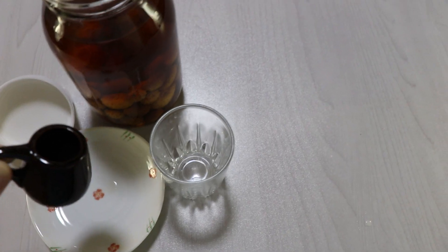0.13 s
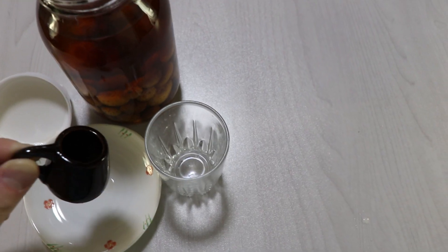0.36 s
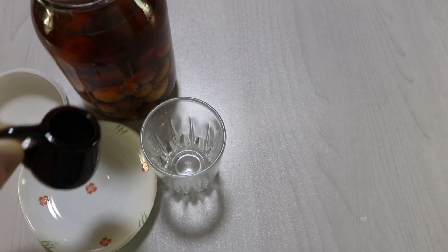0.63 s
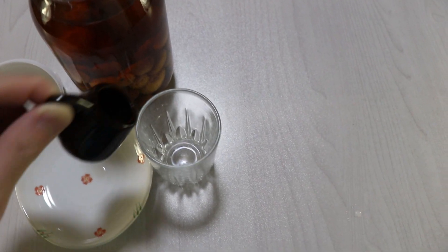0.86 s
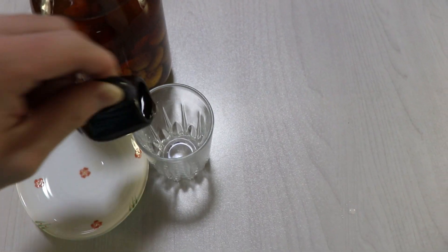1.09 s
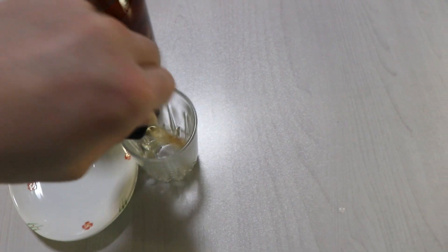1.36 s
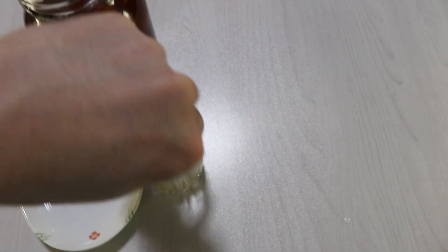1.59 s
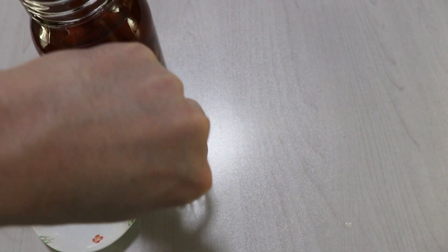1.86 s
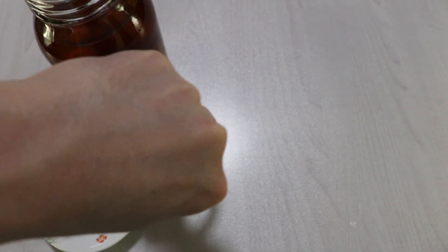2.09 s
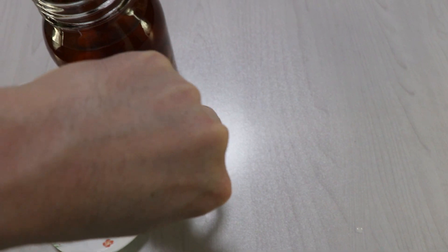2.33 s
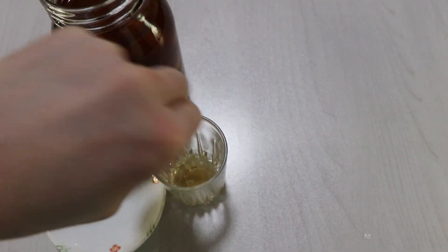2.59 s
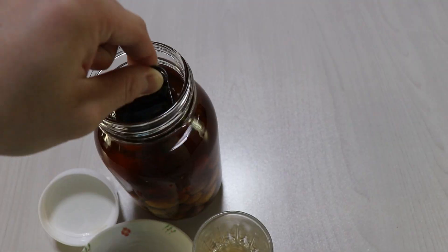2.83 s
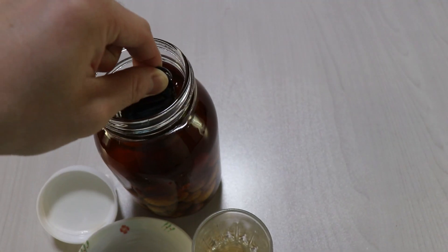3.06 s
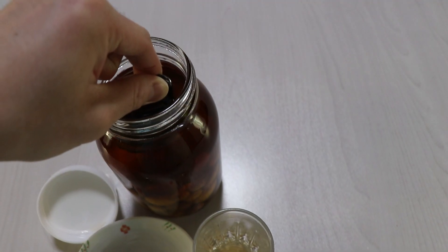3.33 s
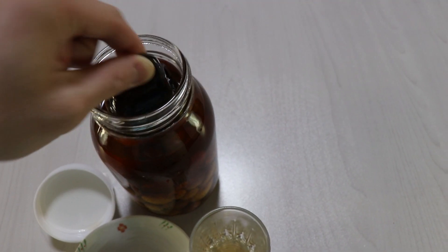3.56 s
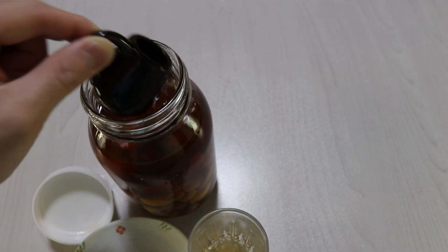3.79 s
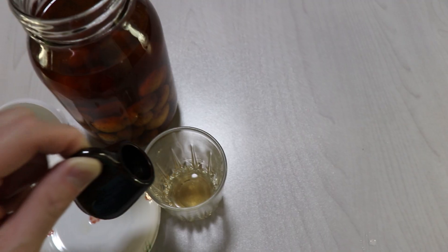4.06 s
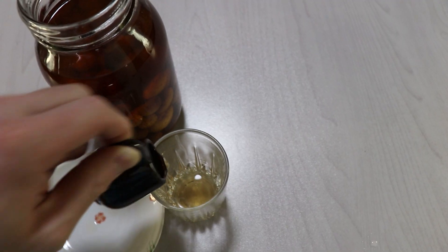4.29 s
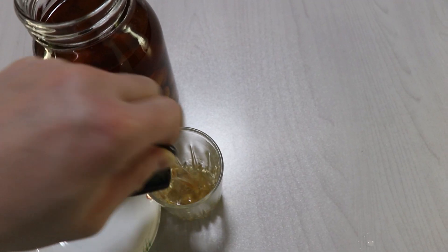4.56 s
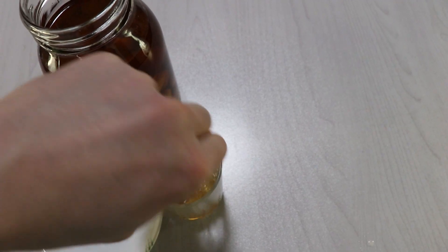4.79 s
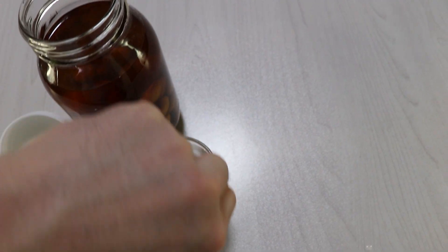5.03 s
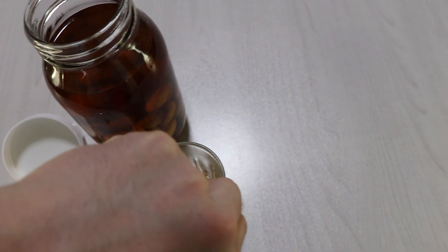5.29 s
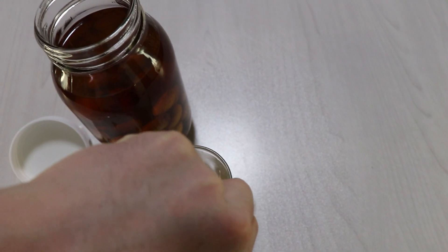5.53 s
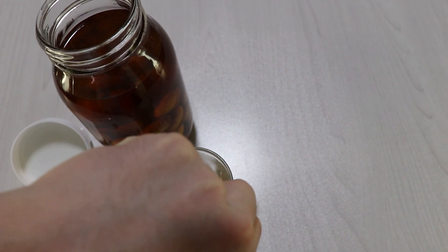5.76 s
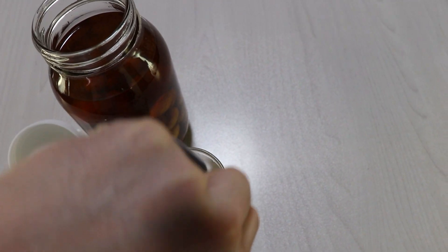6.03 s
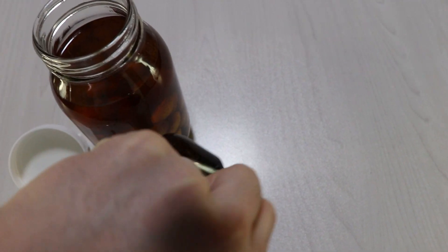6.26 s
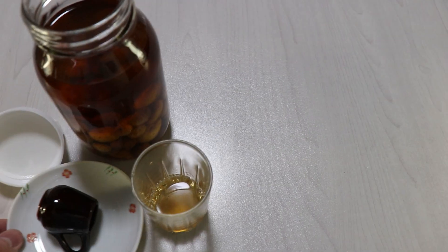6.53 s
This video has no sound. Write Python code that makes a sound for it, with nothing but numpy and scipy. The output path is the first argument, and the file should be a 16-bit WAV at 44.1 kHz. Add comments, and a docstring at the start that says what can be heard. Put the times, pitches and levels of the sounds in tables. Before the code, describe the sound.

Soft hiss and low hum, then a quick wet plop and drops in a drinking glass. A dull knock and later a hard cluster of cracks come from a cup in a full jar. A second, longer pour mixes hollow plops, fine trickling and bright rim clinks. The close stereo sound ends abruptly on a rough saucer slide over wood in a small room.

```python
"""Syrup poured from a cup into a glass

A small quiet room, two close microphone ports, hiss, room rumble and a low hum that comes and goes.
A small ceramic cup pours syrupy liquid into a drinking glass: plops, drops, a trickle and air humming.
Faint ticks, perhaps a clock, are short sines with a splat of noise, made like the plops and drops.
The cup knocks inside a full jar on a wooden table, clinks and drags on the glass rim: decaying modes, cracks.
At the end a saucer slides on the table: uneven noise through the table's resonances."""
import sys
import numpy as np
from scipy import signal
from scipy.fft import rfft, irfft, next_fast_len
from scipy.io import wavfile
from scipy.ndimage import uniform_filter1d

SR = 44100
rng = np.random.default_rng(int(sys.argv[2]) if len(sys.argv) > 2 else 0)


def makeup_ratio(level_db):
    """Linear amplitude ratio for a level in decibels (20 dB per factor of ten)."""
    decades = np.asarray(level_db, float) / 20
    return 10 ** decades


def to_wav(s):
    """Save 16-bit WAV."""
    ch = np.atleast_2d(s).T  # columns
    pcm = np.round(np.clip(ch, -1, 1) * 32767)  # PCM
    wavfile.write(sys.argv[1], SR, pcm.astype(np.int16))


N = 292541

# modes of the wooden table: (frequency [Hz], relative level [dB], t60 [s])
TABLE_MODES = [(93.4, -4.5, 0.4), (118.3, -15.5, 0.83), (161, -10.5, 0.15), (359, -12, 0.16)]


def unit(x):
    """Bring to rms 1."""
    return x / np.sqrt(np.mean(x ** 2) + 1e-20)


def along(points, hz):
    """Interpolate (frequency, value) points on a log frequency axis."""
    f, v = np.transpose(points)
    return np.interp(np.log(hz + 1), np.log(f + 1), v)


def levels(rows):
    """A gain per sample for each dB column, -120 dB before the first row; the last row holds to the end."""
    s, *columns = np.transpose(rows)
    return [makeup_ratio(np.interp(np.arange(N) / SR, s, db, -120, db[-1])) for db in columns]


def peaks(rows):
    """Gain of the loudest among swells given as (time [s], level [dB], rise [dB/s], fall [dB/s])."""
    t = np.arange(N) / SR
    swells = [db - np.maximum(rise * (s - t), fall * (t - s)) for s, db, rise, fall in rows]
    return makeup_ratio(np.max(swells, axis=0))


def filtered(x, response):
    """Pass x through a complex response of frequency."""
    m = next_fast_len(N + 8192)
    return irfft(rfft(x, m) * response(np.fft.rfftfreq(m, 1 / SR)), m)[..., :N]


def resonance(hz, centre, width):
    """Complex response of one damped resonance, 1 at its centre."""
    return 1j * hz * width / (centre * centre - hz * hz + 1j * hz * width)


def add(track, s, sound):
    """Lay a sound into the track at a time in seconds."""
    part = track[round(s * SR):][:len(sound)]
    part += sound[:len(part)]


def ring(modes, attack, split, tilt_db=lambda hz: 0):
    """One blow on a set of modes at new strengths; uneven walls give each two weaker, shorter neighbours."""
    t = np.arange(SR // 2) / SR
    out = np.zeros(len(t))
    hz, db, t60 = np.repeat(np.transpose(modes), 3, axis=1)
    beside = np.arange(len(hz)) % 3 > 0
    db = db - 4 * beside + tilt_db(hz)
    db = db + rng.normal(0, 2.5, hz.shape)
    hz = hz * (1 + split * beside * rng.standard_normal(hz.shape))
    lives = t60 / np.where(beside, 1.6, 1)
    for f, level_db, life in zip(hz, db, lives):
        u = t[:round(life * SR)]
        add(out, 0, makeup_ratio(level_db - 60 * u / life) * np.sin(2 * np.pi * f * u))
    return out * (1 - np.exp(-t / attack))


def crack(t60):
    """The spit of hard contact: coloured noise that decays at once."""
    # colour of the spit: (frequency [Hz], relative level [dB per Hz])
    spit_colour = [(300, -14), (1500, 2.5), (4000, -0.5), (7500, 1.5), (11000, -10)]
    t = np.arange(4096) / SR
    colour = makeup_ratio(along(spit_colour, np.fft.rfftfreq(len(t), 1 / SR)))
    noise = irfft(rfft(rng.standard_normal(len(t))) * colour)
    return unit(noise) * makeup_ratio(-60 * t / t60)


def pair(colour):
    """Stereo noise of rms 1, partly shared by both ports, most of all in the bass."""
    # likeness of the two ports: (frequency [Hz], left-right correlation [0..1])
    likeness = [(60, 1), (170, 0.75), (480, 0.75), (1350, 0.21), (3810, 0.066), (10800, 0.016)]

    def mid_side(hz):
        turn = np.arccos(np.clip(along(likeness, hz), -1, 1)) / 2
        return colour(hz) * [np.cos(turn), np.sin(turn)]

    mid, side = filtered(rng.standard_normal((2, N)), mid_side)
    return unit(np.array([mid + side, mid - side]))


def background():
    """Microphone hiss under room rumble and a wavering low hum, all shaped noise."""
    # colour of the hiss: (frequency [Hz], relative level [dB per Hz])
    hiss_colour = [(88, -34), (150, 4), (193, -11), (303, -4), (420, -11), (459, -7.5), (570, -11),
                   (613, -12), (5850, -19), (11200, -23), (14600, -48), (22000, -120)]
    # colour of the rumble: (frequency [Hz], relative level [dB per Hz])
    rumble_colour = [(8.8, -49), (15, -8), (35, 5.5), (47, 1), (65, -10), (86, -16.5), (103, -11.5),
                     (166, -21), (200, -31), (260, -61.5), (440, -120)]
    # the hum comes and goes: (time [s], level before the port gains [dB])
    hum_course = [(0, -61), (.5, -57), (1.2, -73.5), (1.7, -63.5), (2.0, -56.5), (3.3, -56.5), (3.6, -72.5),
                  (6.63, -74.5)]
    hiss = makeup_ratio(-61) * pair(lambda hz: makeup_ratio(along(hiss_colour, hz)))
    rumble = makeup_ratio(-50.5) * pair(lambda hz: makeup_ratio(along(rumble_colour, hz)))
    hum = levels(hum_course)[0] * pair(lambda hz: 1 / (1 + ((hz - 82) / 3.4) ** 2))
    port_gains = makeup_ratio([[.6], [-.6]])  # left a little louder
    return hiss + (rumble + hum) * port_gains


def room(x):
    """Walls answer from 1 s on; each quarter second meets its own noise tail, more alike at both ports in the bass."""
    # decay of the room: (frequency [Hz], t60 [s])
    decay = [(100, 0.44), (500, 0.27), (2000, 0.21), (10000, 0.12)]
    out, step = np.zeros((2, N + SR)), SR // 4
    for start in range(SR, N, step):
        hz, t, (mid, side) = signal.stft(rng.standard_normal((2, SR // 3)), SR, nperseg=256)
        side = side * np.clip(hz / 2500, .25, 1)[:, None]
        fade = makeup_ratio(-60 * t / along(decay, hz)[:, None])
        tail = signal.istft(np.array([mid + side, mid - side]) * fade, SR, nperseg=256)[1]
        wet = signal.fftconvolve(x[None, start:start + step], tail / np.linalg.norm(tail[0]), axes=1)
        out[:, start + 200:][:, :wet.shape[1]] += wet  # the answer comes 200 samples late
    return out[:, :N]


def saucer():
    """The foot ring judders over the wood grain and shakes the table's resonances."""
    # course of the slide: (time [s], rumble level [dB], grit level [dB])
    slide = [(6.44, -69, -78), (6.49, -40.5, -50), (6.53, -28.5, -39), (6.56, -21, -33), (6.6, -23, -33.5),
             (6.63, -23, -24)]
    # table resonances under the saucer: (frequency [Hz], width [Hz], relative level [dB])
    slide_body = [(121, 16, -5.5), (323, 26, 5), (475.6, 32, 2), (627, 79, -8.5), (879, 160, -10),
                  (1050, 450, -15)]
    # colour of the grit: (frequency [Hz], relative level [dB per Hz])
    grit_colour = [(530, -14), (900, -6), (2100, -4.5), (2540, -16), (3100, -17), (5280, -23.5),
                   (9110, -37), (11000, -63), (14300, -67.5), (22000, -120)]

    def body(hz):
        # neighbouring resonances have opposite signs
        return sum((-1) ** k * makeup_ratio(db) * resonance(hz, centre, width)
                   for k, (centre, width, db) in enumerate(slide_body))

    rumble_gain, grit_gain = levels(slide)
    noise = rng.standard_normal((2, N))
    judder_db = 33 * uniform_filter1d(rng.standard_normal(N), size=100)
    slips = noise * makeup_ratio(judder_db)
    rumble = unit(filtered(slips[0], body))
    grit = unit(filtered(slips[1], lambda hz: makeup_ratio(along(grit_colour, hz))))
    return rumble_gain * rumble + grit_gain * grit


def jar():
    """The wall rings near where it is hit, upper modes only under hard contact; the weight thumps the table."""
    # cup against the jar:
    # (time [s], ring level [dB], table thump level [dB], best driven pitch [Hz], crack level [dB])
    knocks = [(2.705, -46.5, -35.5, 630, -44), (2.845, -17, -22, 1090, -30), (2.872, -31, -36, 1020, -69),
              (3.601, -12.5, -22, 1780, -10.5), (3.608, -23.5, -35, 1540, -33),
              (3.634, -15.5, -24.5, 1590, -20.5), (3.645, -19, -40.5, 1660, -21.5),
              (3.663, -14.5, -28.5, 2460, -11.5)]
    # modes of the full jar: (frequency [Hz], relative level [dB], t60 [s])
    jar_modes = [(355, -4, 0.2), (530, -5.5, 0.14), (690, 1.5, 0.041), (1020, -2, 0.084), (1280, -4.5, .04),
                 (1540, 2.5, 0.04), (1669, -5, 0.099), (1800, -6, 0.06), (2047, -6, 0.085),
                 (2450, -2.5, 0.061), (2542, -4.5, 0.05), (2937, -7, .05), (3350, -10, 0.098),
                 (3886, -9, .05), (4300, -16.5, 0.041), (6100, -21, .05), (8400, -7.5, 0.045),
                 (9600, -16.5, .05)]
    spot_db_per_octave, top_db = 12.5, -3  # loss away from the driven pitch; upper modes over the crack
    out = np.zeros(N)
    for s, db, thump_db, hz, crack_db in knocks:
        def spot(f):
            near_db = db - spot_db_per_octave * np.abs(np.log2(f / hz))
            return np.where(f > 3500, crack_db + top_db, near_db)

        add(out, s, ring(jar_modes, 0.0004, .05, spot))
        add(out, s, makeup_ratio(thump_db) * ring(TABLE_MODES, 0.0017, 0.027))
        add(out, s, makeup_ratio(crack_db) * crack(0.0084))
    return out


def glass():
    """Each contact rings the rim and rocks the glass on the table; dragging keeps the rim singing roughly."""
    # cup against the glass: (time [s], ring level [dB], knock level [dB], crack level [dB])
    clinks = [(1.279, -73, -43.5, -66), (1.575, -61.5, -47, -46.5), (1.642, -47, -46, -33.5),
              (1.758, -52, -50, -48.5), (4.357, -28, -12.5, -28), (4.541, -40, -36.5, -43),
              (4.614, -46.5, -44.5, -54.5), (4.637, -44.5, -42, -48.5), (4.656, -27.5, -16, -22.5),
              (4.697, -37, -39.5, -35.5), (4.746, -49, -34, -42.5), (4.78, -16.5, -16, -14),
              (4.802, -22.5, -26.5, -32), (4.887, -46.5, -34, -54), (5.029, -56, -33.5, -42.5),
              (5.278, -18, -29, -17), (5.294, -24.5, -44.5, -32.5)]
    # modes of the rim: (frequency [Hz], relative level [dB], t60 [s])
    rim_modes = [(2808, -11, 0.35), (2884, -0.5, 0.11), (2420, -21.5, .08), (3180, -8.5, .11),
                 (3348, -13, .12), (4700, -22.5, 0.07), (6300, -6.5, 0.055), (6736, 0.5, 0.063),
                 (8800, -18, .04), (10040, -19, 0.051)]
    # modes of the glass rocking on the table: (frequency [Hz], relative level [dB], t60 [s])
    rock_modes = [(315, -8, 0.055), (393.4, -4.5, .07), (521, 2, 0.04), (636, 0, 0.063), (805, 3.5, 0.037),
                  (988, -4.5, 0.06), (1155.5, -2.5, 0.091), (1670, 5, .04), (1830, -3, 0.056),
                  (2204.5, -1.5, 0.052)]
    # the cup drags on the wet rim: (start [s], hardest moment [s], level [dB])
    drags = [(1.613, 1.646, -40.5), (4.36, 4.399, -27), (4.79, 4.868, -42), (5.168, 5.202, -42)]
    dull_top_hz, sharper_db_per_octave = 1600, 28  # a 0 dB knock dulls above this, weaker ones lower
    lift_s = 5.27  # until the cup lifts off, its weight on the rim damps the ring
    top_db, shake_db, drag_shake_db = -5.5, -17, -11  # upper modes over crack; table under rim, under a drag
    drag_start_db, drag_ebb = 9.5, 449  # start below the hardest moment [dB]; fall after it [dB/s]
    out, rock = np.zeros(N), np.zeros(N)
    t, now = np.arange(SR // 2) / SR, np.arange(N) / SR
    rest_db = -149.5 * t
    # every clink lands twice, 9.9 ms apart, the second time weaker
    bounced = np.add(clinks, (0.0099, -1.5, -8, -7))
    for s, db, knock_db, crack_db in [*clinks, *bounced]:
        def hard(f):
            return np.where(f > 4000, crack_db + top_db, db)  # a hard contact drives the upper modes

        dull_hz = dull_top_hz * 2 ** (knock_db / sharper_db_per_octave)

        def dull(f):
            return -10 * np.log10(1 + (f / dull_hz) ** 4)

        add(out, s, ring(rim_modes, .0004, .009, hard) * makeup_ratio(rest_db * (s < lift_s)))
        add(out, s, makeup_ratio(db + shake_db) * ring(TABLE_MODES[1:3], .002, .05) * makeup_ratio(rest_db))
        add(rock, s, makeup_ratio(knock_db) * ring(rock_modes, 0.0011, 0.056, dull))
        add(out, s, makeup_ratio(crack_db) * crack(.012))
    press = sum((now > start) * peaks([(s, db, drag_start_db / (s - start), drag_ebb)])
                for start, s, db in drags)
    drag = rng.standard_normal(N) * press
    rim = ring(rim_modes, 0.00023, 0.0098, lambda f: -15 * (f > 4000)) * makeup_ratio(rest_db)
    wood = ring(TABLE_MODES[1:3], .002, .05) * makeup_ratio(rest_db)
    body = rim / np.linalg.norm(rim) + makeup_ratio(drag_shake_db) * wood / np.linalg.norm(wood)
    # a light glass radiates nothing low
    rock = signal.sosfilt(signal.butter(3, 270, 'high', fs=SR, output='sos'), rock)
    return out + rock + signal.fftconvolve(drag, body)[:N]


def trickle(count=4000):
    """Tiny random bubbles in the running liquid; its noisy stirring also sets the air in the glass humming."""
    # gushes of liquid: (time of strongest flow [s], level [dB], swell [dB/s], ebb [dB/s])
    gushes = [(1.575, -35.5, 2500.5, 154), (1.66, -38.5, 98, 350), (1.76, -61, 100, 60),
              (4.5, -59, 247.5, 44.5), (4.92, -47.5, 40, 218), (5.2, -56.5, 148, 158)]
    # liquid runs: (start [s], end [s])
    pours = [(1.563, 1.83), (4.42, 5.28)]
    # air in the glass, one list for each pour: (frequency [Hz], width [Hz], relative level [dB])
    air_modes = [
        [(1412, 35, -3.5), (975, 90, -6.5)],
        [(973, 140, 8.5), (1400, 150, -15)],
    ]
    when, pitch, size = rng.random((count, 3)).T
    now = np.arange(N) / SR
    running = [(now > start) & (now < end) for start, end in pours]
    wet = np.flatnonzero(np.any(running, axis=0))
    t = np.arange(300) / SR
    hz = 1300 * makeup_ratio(18 * pitch)[:, None]
    age = hz * t / 2.2
    gain = makeup_ratio(14 * size ** 3 - 4 * pitch)[:, None]
    grain = np.sin(2 * np.pi * hz * t) * age * np.exp(-age) * gain
    at = wet[(when * len(wet)).astype(int)][:, None] + np.arange(300)
    fizz = np.bincount(at.ravel(), grain.ravel(), N)
    flow = peaks(gushes)
    fizz = fizz / np.std(fizz[fizz != 0]) * flow
    noise = rng.standard_normal(N)
    waver_db = 40 * uniform_filter1d(rng.standard_normal(N), size=200)
    stir = noise * flow * makeup_ratio(waver_db)

    def air(rows):
        # the root evens out the noise power that each width lets through
        return lambda f: sum(makeup_ratio(db) * np.sqrt(SR / (np.pi * width)) * resonance(f, centre, width)
                             for centre, width, db in rows)

    return fizz + sum(filtered(stir * on, air(rows)) for on, rows in zip(running, air_modes))


def drops_and_ticks():
    """A short sine starts fast, holds and collapses while its pitch rises, as an air pocket does, over a splat."""
    # short pitched sounds: plops and drops in the liquid, and faint ticks, perhaps a clock,
    # near 1.8 kHz at 2.06, 3.03 and 4.24 s: (time [s], level [dB], pitch [Hz])
    short_sounds = [(1.418, -25.5, 2250), (1.422, -27, 2685), (1.433, -26, 2580), (1.459, -33, 7500),
                    (1.463, -20, 6370), (1.563, -22, 2070), (1.566, -18.5, 6390), (1.575, -6.5, 1400),
                    (1.576, -26, 975), (1.591, -28, 8200), (1.639, -24, 3360), (1.64, -24.5, 4300),
                    (1.661, -34.5, 1333), (1.684, -30, 1276), (1.702, -20.5, 5070), (1.713, -26, 5370),
                    (1.759, -33.5, 3080), (1.76, -40, 1750), (2.061, -49.5, 1745), (3.033, -44.5, 1740),
                    (4.02, -34.5, 4870), (4.032, -52, 4900), (4.242, -46.5, 1800), (4.47, -33.5, 4300),
                    (4.477, -27, 1250), (4.541, -17.5, 4930), (4.545, -24, 6300), (4.555, -22, 5300),
                    (4.558, -15, 1007), (4.558, -28, 1400), (4.579, -26, 1050), (4.615, -35, 970),
                    (4.71, -23.5, 885), (4.815, -22.5, 4700), (4.887, -16.5, 896), (4.888, -26.5, 1450),
                    (4.901, -26.5, 5060), (4.92, -21, 1413), (4.921, -29, 7195), (4.936, -19, 937),
                    (4.966, -29, 974), (4.973, -22, 5170), (5.043, -28.5, 4120), (5.116, -36.5, 8290),
                    (5.141, -30.5, 5500), (5.178, -30.5, 6840), (5.204, -28, 6580)]
    life_cycles, rise = 18.9, 0.012  # cycles in one unit of age; share the phase gains by then
    splat_db, splat_db_per_octave = -17.5, 2  # splat against a 1 kHz sine, louder for higher pitches
    splat_octaves, splat_t60 = .45, .03  # half-width of its band [octaves]; decay [s]
    out, u = np.zeros(N), np.arange(4096) / SR
    f = np.fft.rfftfreq(len(u), 1 / SR) + 1
    for s, db, hz in short_sounds:
        age = u * hz / life_cycles
        hump = (1 - np.exp(-7 * age)) * np.exp(-.6 * age - 1.5 * age ** 2)
        add(out, s, makeup_ratio(db) * hump * np.sin(2 * np.pi * hz * u * (1 + rise * age)))
        band = np.exp(-(np.log2(f / hz) / splat_octaves) ** 2)
        splat = unit(irfft(rfft(rng.standard_normal(len(u))) * band))
        start_db = db + splat_db + splat_db_per_octave * np.log2(hz / 1000)
        add(out, s, makeup_ratio(start_db - 60 * u / splat_t60) * splat)
    return out


def ports(x, lead, pan_db):
    """The left port hears it lead samples sooner and pan_db louder than the right."""
    side = np.array([[1], [-1]]) / 2
    return filtered(x, lambda hz: makeup_ratio(pan_db * side) * np.exp(2j * np.pi * hz * lead * side / SR))


def scene():
    """All sources near the microphone, their room answer and the background."""
    liquid_and_ticks = drops_and_ticks() + trickle()
    # (sound, lead [samples], pan [dB], send to the room [dB])
    sources = [(jar(), 2.5, 2.2, -6), (glass(), 3.9, 1.1, -7),
               (liquid_and_ticks, 3.8, .8, -10), (saucer(), 3.9, 1.9, -9)]
    direct = sum(ports(x, lead, pan_db) for x, lead, pan_db, _ in sources)
    answer = room(sum(makeup_ratio(wet_db) * x for x, _, _, wet_db in sources))
    return direct + answer + background()


def roll_off(x):
    """The treble ends steeply here."""
    return signal.sosfilt(signal.butter(12, 11350, fs=SR, output="sos"), x)


def record(dry):
    """Steep band limit at 11080 Hz, then a hard ceiling at full scale."""
    limited = filtered(dry, lambda hz: 1 / (1 + (hz / 11080) ** 60))
    mix = np.clip(limited, -1, 1)
    return roll_off(mix)


dry = scene()
out = record(dry)
to_wav(out)
```